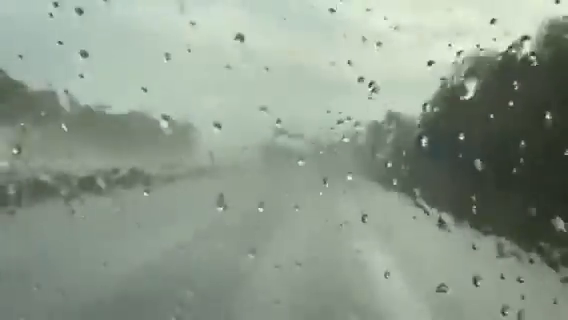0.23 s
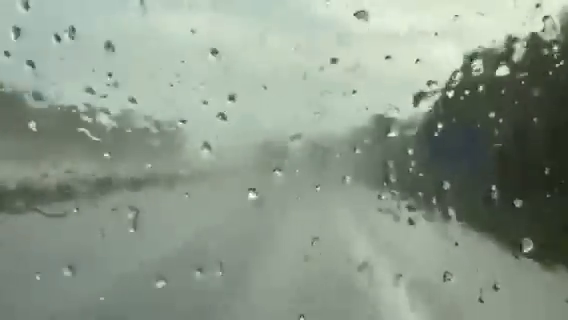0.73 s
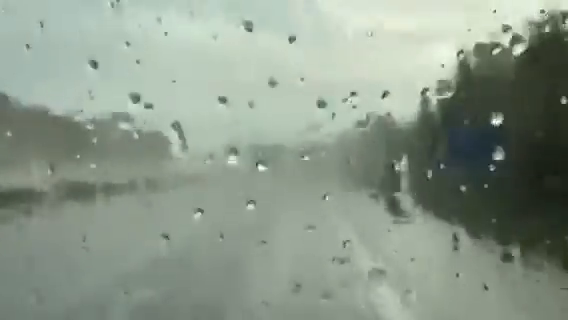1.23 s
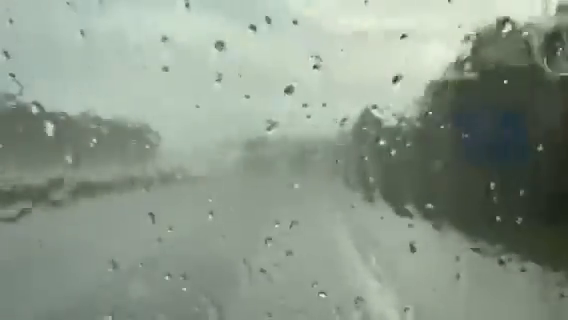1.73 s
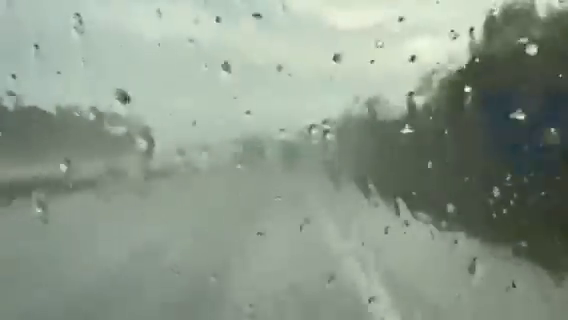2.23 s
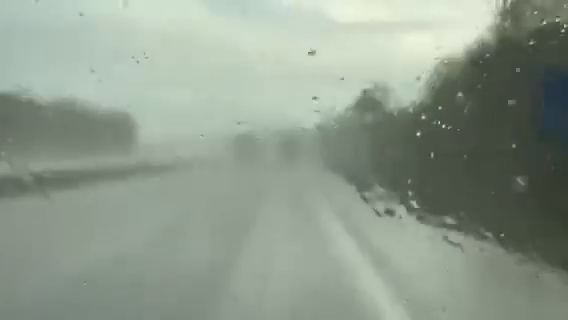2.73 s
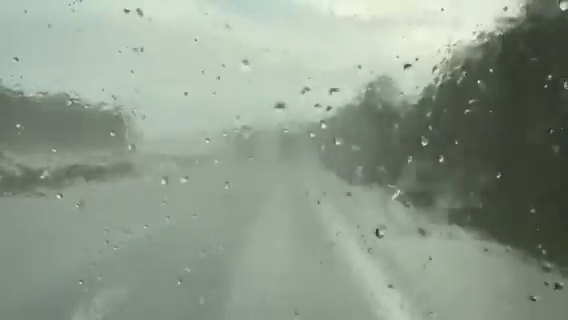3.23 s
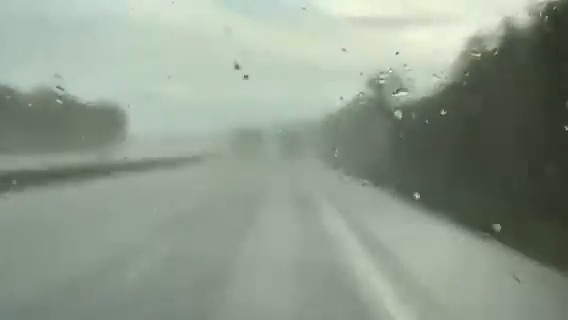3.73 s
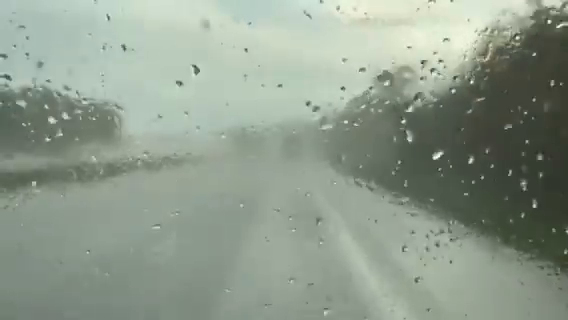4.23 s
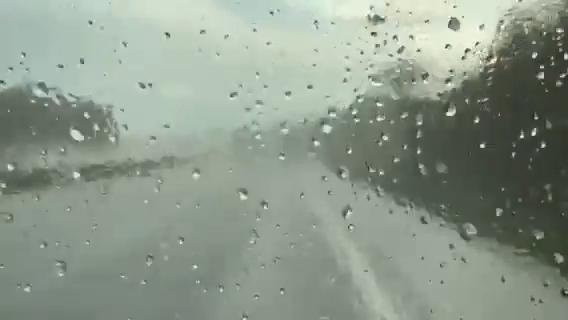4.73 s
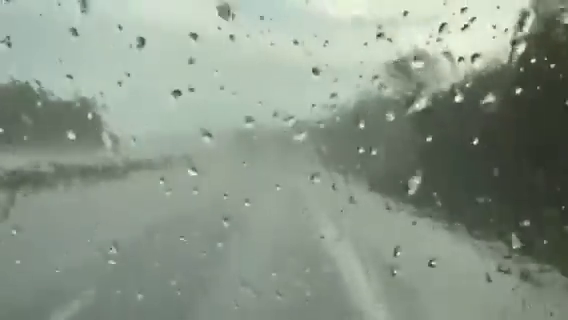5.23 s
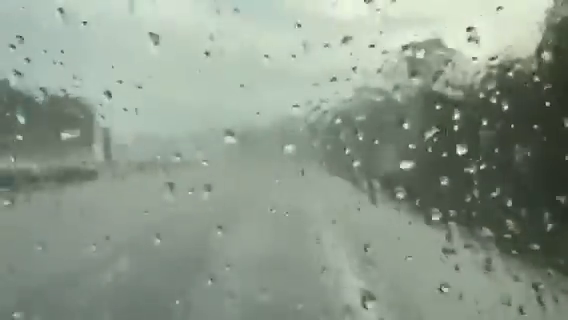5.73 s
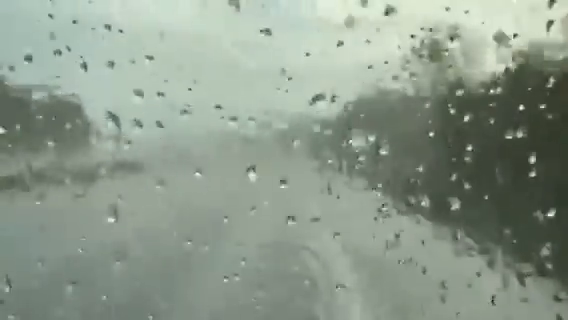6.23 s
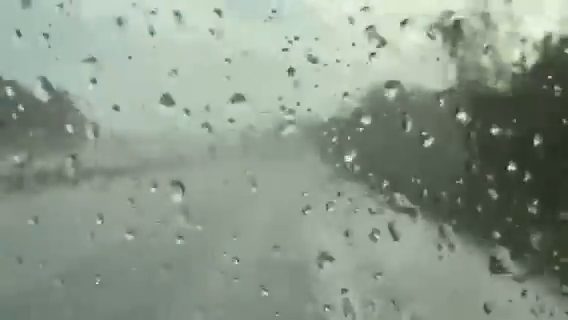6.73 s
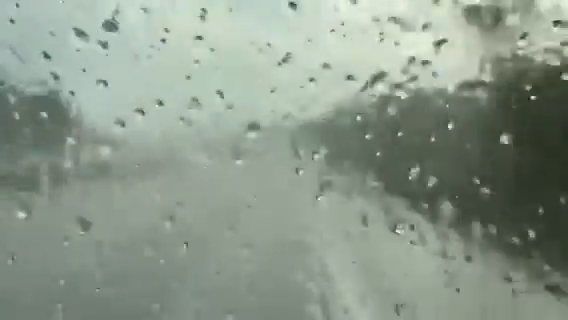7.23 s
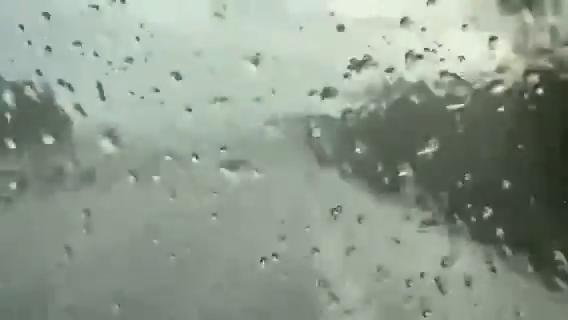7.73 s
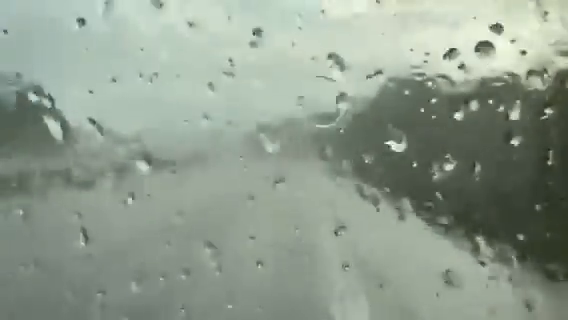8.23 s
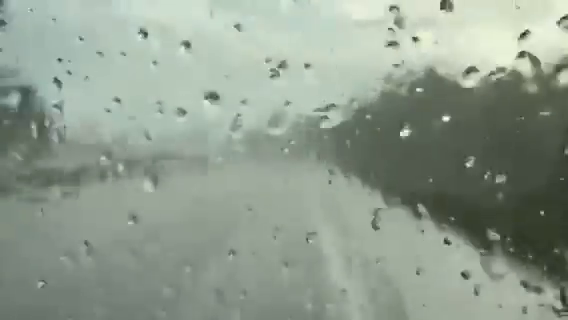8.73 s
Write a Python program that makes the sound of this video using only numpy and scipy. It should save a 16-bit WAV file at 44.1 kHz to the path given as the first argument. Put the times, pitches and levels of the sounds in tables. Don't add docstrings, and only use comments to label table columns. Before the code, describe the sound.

Heavy rain patters and hisses against car glass as low road rumble and engine drone continue, rising briefly during a lower gear.

```python
import sys
import numpy as np
from scipy import signal
from scipy.fft import rfft, irfft, next_fast_len
from scipy.io import wavfile
from scipy.ndimage import uniform_filter1d

SR = 44100
rng = np.random.default_rng(int(sys.argv[2]) if len(sys.argv) > 2 else 0)


def amplitude_ratio(level_db):
    exponent = np.asarray(level_db, float) / 20
    return 10 ** exponent


def master(y):
    cut = np.clip(np.atleast_2d(y).T, -1, 1)
    pcm = np.round(cut * 32767)
    wavfile.write(sys.argv[1], SR, pcm.astype(np.int16))


N = 395577

# t/s, level/dB
RAIN_STRENGTH = [(0.0, -27.5), (0.05, -25.5), (0.47, -22.5), (0.5, -24.5), (1.1, -24.5), (1.15, -27.5),
                 (1.35, -25), (2.55, -27.5), (3.37, -22.5), (3.47, -25), (4.19, -22.5), (5.87, -22),
                 (7.04, -23.5), (7.37, -27.5), (7.57, -25.5), (7.82, -29.5), (8.94, -27), (8.97, -31)]
# f/Hz, density/dB
RAIN_COLOUR = [(220, 6.5), (300, 3), (500, -0.53), (850, -1.5), (1300, -7.5), (1800, -4.5), (2500, -3),
               (3500, -7), (5000, -9), (6200, -13), (8500, -11.5), (11000, -16), (14000, -14),
               (15600, -14.5)]
# f/Hz, half-width/Hz, gain/dB
CABIN_DIPS = [(222, 7.9, -18.5), (348, 19, -3.5)]
# low f/Hz, high f/Hz, rate/(1/s), burst/ms, size spread/dB, level/dB
DROP_KINDS = [
    (500, 3600, 1000, 3.2, 2, -7.5),
    (3970, 10000, 450, 1.8, 3.5, -5.5),
    (9500, 13000, 170, 0.85, 3.5, -3),
    (2830, 5700, 320, 1.7, 3.5, -7),
]
# t/s, peak/dB, dull share/dB
SPLATS = [(0.059, -9, -15), (0.2254, -11, -8), (0.2725, 1, -10), (0.634, -12, -9), (1.101, -17, -11),
          (1.5327, -11, -14), (2.4561, -11, 1), (3.039, -12, -6), (3.556, -8, -5), (3.7576, -4, -14),
          (3.8576, -12, -10), (4.0327, -14, -6), (4.06, -8, -7), (4.3316, -11, -1), (4.477, -4, -16),
          (4.5072, -3, 0), (4.719, -5.5, -11), (4.8737, -8, -1), (5.051, -6, -12), (5.2964, -4.5, -9),
          (5.3737, -10, 0), (5.482, -5.5, -3), (5.5997, -14, 11), (5.6445, -15, -4), (5.8092, -14, -2),
          (6.091, -14, 0), (6.5203, -18, -8), (6.6927, -11, -2), (8.2526, -10, -15), (8.364, -9, -14)]
# t/s, level/dB
ROAD_ROUGHNESS = [(0, -22.5), (1.2, -24), (1.7, -22.5), (2.6, -26.5), (3.4, -23), (3.9, -25), (5.1, -22),
                  (5.7, -26), (6.5, -28.5), (7.4, -26.5), (8.2, -29.5), (8.97, -26.5)]
# f/Hz, density/dB
RUMBLE_COLOUR = [(15, -35), (27, -14), (40, 3.5), (55, 2.5), (95, 4), (130, -1.5), (160, -2.5), (195, -1),
                 (215, -7.5), (235, -11), (320, -29), (550, -90)]
# t/s, f/Hz
TOP_GEAR_TURNS = [(0, 28.6), (.4, 28.36), (3.6, 28.42), (3.93, 28.55), (6, 28.65), (7.2, 28.62),
                  (7.9, 28.42), (8.97, 28.3)]
# t/s, level/dB
THROTTLE = [(0, -26.5), (1.6, -26.5), (4.8, -27), (5.8, -27), (6.5, -26.5), (7.9, -33.5), (8.5, -28),
            (8.7, -57), (8.97, -38)]
# multiple of crankshaft rate, level/dB
ENGINE_ORDERS = [(2, -7), (3, 2), (4, -4), (5, -4.5), (6, -1.6), (7, -5)]
# f/Hz, gain/dB
CABIN_GAIN = [(60, -7), (90, -14.5), (113, -2), (145, -6), (172, 1), (186, 4), (205, -26), (240, -31)]
# t/s, whine level/dB
TORQUE = [(0, -47), (.8, -38), (2, -37.5), (2.8, -36), (5.4, -40.5), (6.6, -47), (8, -42), (8.97, -41)]
# t/s, f/Hz, peak/dB, t60/s
BOOMS = [
    (.41, 76, -18, .56),
    (1.58, 79.5, -14, .5),
    (2.6, 96, -19, .7),
    (3.77, 80, -9, .31),
    (4.4, 56, -18, .6),
    (4.85, 92, -14, .36),
    (5.55, 95, -21, .5),
    (8.6, 66, -19, .94),
]
# f/Hz, correlation
PORT_LIKENESS = [(40, .997), (90, .98), (130, .94), (200, .85), (320, .65), (420, .78), (680, .5),
                 (850, .56), (1100, .42), (1500, .15), (1800, .5), (2200, .82), (2600, .89), (3000, .945),
                 (3400, .97), (3600, 1)]
# f/Hz, left minus right/dB
PORT_LEAN = [(60, -.5), (140, 1), (230, .1), (420, 2.5), (800, 1), (1200, 3), (1650, 7), (2100, 2.5),
             (2700, 0)]
# start t/s, end t/s
STRICT_SPANS = [(2.4, 4.33), (6.9, 9.5)]

DOWN_S, UP_S, SHIFT_S, LOW_GEAR_RATIO = 1.56, 3.875, .115, 1.294
PORT_TURN_HZ, FOLD_HZ = 3848, 7696


def evened(x):
    return x / np.sqrt(np.mean(x ** 2) + 1e-20)


def read(points, hz):
    f_hz, value = np.transpose(points)
    return np.interp(np.log(hz + 1), np.log(f_hz + 1), value)


def curve(rows):
    t_s, value = np.transpose(rows)
    return np.interp(np.arange(N) / SR, t_s, value)


def between(t_s, start_s, end_s, ramp_s):
    return np.clip(np.minimum(t_s - start_s, end_s - t_s) / ramp_s + .5, 0, 1)


def drift(per_s):
    knots = rng.standard_normal(4000)
    return evened(np.interp(np.arange(N) / SR * per_s, np.arange(4000), knots))


def shaped(x, gain):
    size = next_fast_len(N)
    spectrum = rfft(x, size) * gain(np.fft.rfftfreq(size, 1 / SR))
    return irfft(spectrum, size)[..., :N]


def band(x, low_hz, high_hz):
    return shaped(x, lambda hz: 1 / np.sqrt((1 + (low_hz / (hz + 1)) ** 4) * (1 + (hz / high_hz) ** 4)))


def burst(ms):
    u = np.arange(600) / (SR * ms / 1000)
    return (1 - np.exp(-u / .08)) * np.exp(-u)


def wash():
    real, imag = rng.standard_normal((2, 2, 257, N // 128 + 5))
    patches = rng.standard_normal(real.shape[1:])
    patches = uniform_filter1d(patches, 9, 0)
    patches = evened(uniform_filter1d(patches, 16, 1))
    spray = (real + 1j * imag) * amplitude_ratio(1.48 * patches)
    return evened(signal.istft(spray, nperseg=512, noverlap=384)[1][:, :N])


def patter():
    gust_db = 1.1 * drift(30.)
    out = np.zeros((2, N))
    for low_hz, high_hz, per_s, ms, spread_db, db in DROP_KINDS:
        size = amplitude_ratio(spread_db * np.minimum(rng.exponential(1, N), 2.8))
        bunching_db = gust_db + (1.2 + low_hz / 5000) * drift(19.)
        hits = size * (rng.random(N) < amplitude_ratio(bunching_db) * per_s / SR)
        opening = evened(signal.oaconvolve(hits, burst(ms))[:N])
        out += amplitude_ratio(db) * band(opening * rng.standard_normal((2, N)), low_hz, high_hz)
    return out


def rain():
    strength_db = curve(RAIN_STRENGTH)
    roar_follows, mean_rain_db = 0.68, -25.5
    roar_db = 0.77 - (1 - roar_follows) * (strength_db - mean_rain_db)
    wet = amplitude_ratio(-4.5) * wash() + patter()
    wet = shaped(wet, lambda hz: amplitude_ratio(read(RAIN_COLOUR, hz)) / np.sqrt(1 + (210 / (hz + 1)) ** 8))
    wet = shaped(wet, lambda hz: amplitude_ratio(sum(db / (1 + ((hz - f) / w) ** 2) for f, w, db in CABIN_DIPS)))
    roar = shaped(wet, lambda hz: 1 / (1 + (hz / 1600) ** 4))
    bright = wet - roar
    return amplitude_ratio(strength_db + 1.32) * (bright + amplitude_ratio(roar_db) * roar) / np.std(bright)


def tyres():
    noise = shaped(rng.standard_normal((2, N)), lambda hz: amplitude_ratio(read(RUMBLE_COLOUR, hz)))
    lumps_db = 0.7 * drift(9.)
    return amplitude_ratio(curve(ROAD_ROUGHNESS) + lumps_db + 1.32) * evened(noise)


def engine():
    t_s = np.arange(N) / SR
    low = between(t_s, DOWN_S, UP_S, SHIFT_S)
    since_s = np.minimum(abs(t_s - DOWN_S), abs(t_s - UP_S))
    flare = .03 * np.exp(-since_s / .12)
    turns_hz = curve(TOP_GEAR_TURNS) * (1 + low * (LOW_GEAR_RATIO - 1 + flare))
    load_db = curve(THROTTLE) - 3.5 * low
    angle = 2 * np.pi * np.cumsum(turns_hz * (1 + .0012 * drift(6.))) / SR
    out = np.zeros(N)
    for order, db in ENGINE_ORDERS:
        level_db = load_db + db + read(CABIN_GAIN, order * turns_hz) + 0.17 * drift(2.3)
        out += np.sqrt(2) * amplitude_ratio(level_db) * np.sin(order * angle + order ** 2)
    return out


def whine():
    teeth_per_turn = 14.36
    hz = teeth_per_turn * curve(TOP_GEAR_TURNS) * (1 + 0.0019 * drift(14.))
    level_db = curve(TORQUE) + 1.26 * drift(8.3)
    return np.sqrt(2) * amplitude_ratio(level_db) * np.sin(2 * np.pi * np.cumsum(hz) / SR)


def splats():
    t_s, peak_db, dull_db = np.transpose(SPLATS)
    treble_db = -4 - .5 * (peak_db - peak_db.mean())
    shares = [(dull_db + 3.5, 1500, 4000), (0, 4000, 8000), (treble_db, 8000, 16500)]
    out = np.zeros(N)
    for share_db, low_hz, high_hz in shares:
        hits = np.zeros(N)
        hits[np.round(t_s * SR).astype(int)] = amplitude_ratio(np.minimum(peak_db + share_db, -8) - 7)
        noise = evened(band(rng.standard_normal(N), low_hz, high_hz))
        out += signal.oaconvolve(hits, burst(1.75))[:N] * noise
    return out


def booms():
    out, t_s = np.zeros(N + SR), np.arange(SR) / SR
    for start_s, hz, db, t60_s in BOOMS:
        envelope = amplitude_ratio(db - 60 * t_s / t60_s) * (1 - np.exp(-t_s / 0.031))
        out[round(start_s * SR):][:SR] += envelope * np.sin(2 * np.pi * hz * t_s)
    return out[:N]


def ports(near, other):
    def same(hz):
        return np.where(hz > FOLD_HZ, .84, read(PORT_LIKENESS, hz))

    def lead(hz):
        return np.exp(2j * np.pi * np.maximum(hz - FOLD_HZ, 0) / PORT_TURN_HZ)

    left = shaped(near, lambda hz: amplitude_ratio(read(PORT_LEAN, hz) / 2))
    right = shaped(near, lambda hz: same(hz) * lead(hz))
    right = right + shaped(other, lambda hz: np.sqrt(1 - same(hz) ** 2))
    return np.array([left, shaped(right, lambda hz: amplitude_ratio(-read(PORT_LEAN, hz) / 2))])


def scene():
    near, other = rain() + tyres()
    noises = ports(near + splats(), other)
    return noises + booms() + engine() * amplitude_ratio([[.7], [-.7]]) + whine() * amplitude_ratio([[2.2], [-5.]])


def fold_weak_stereo(x):
    hz, t_s, z = signal.stft(x, SR, nperseg=2048, noverlap=1024)
    both = np.array([z[0] + z[1], z[0] - z[1]]) / 2
    starts = np.r_[0, 96:160:12, 160:416:32, 416:480:16, 480:576:32, 576:656:16, 656, 672:len(hz):32]
    power = np.add.reduceat(abs(both) ** 2, starts, axis=1)
    low_hz = hz[starts]
    upper_db = np.array([[-4.9], [-5.2]]) + np.array([[-1.2], [0]]) * (low_hz > 12000) + 2.1 * (low_hz > 14400)
    bar_db = np.where(low_hz < 3500, -10, upper_db)[..., None]
    waver_db = 1.2 * uniform_filter1d(rng.standard_normal(power.shape), 2)
    easy_db, tight_db = -.5, 1.6
    strict = sum(between(t_s, *span, .2) for span in STRICT_SPANS)
    strict_db = (easy_db + (tight_db - easy_db) * strict) * np.array([[[1]], [[.4]]])
    bar_db = bar_db + waver_db + strict_db
    kept = (power > amplitude_ratio(bar_db) ** 2 * power[::-1]) | (starts == 0)[:, None]
    band_of_bin = np.searchsorted(starts, np.arange(len(hz)), "right") - 1
    mid, side = both * kept[:, band_of_bin]
    return signal.istft(np.array([mid + side, mid - side]), SR, nperseg=2048, noverlap=1024)[1][:, :N]


def low_pass(x):
    return signal.sosfilt(signal.butter(12, 17080, fs=SR, output="sos"), x)


def record(dry):
    limited = shaped(dry, lambda hz: hz < 15780)
    mix = fold_weak_stereo(limited)
    return low_pass(mix)


dry = scene()
out = record(dry)
master(out)
```